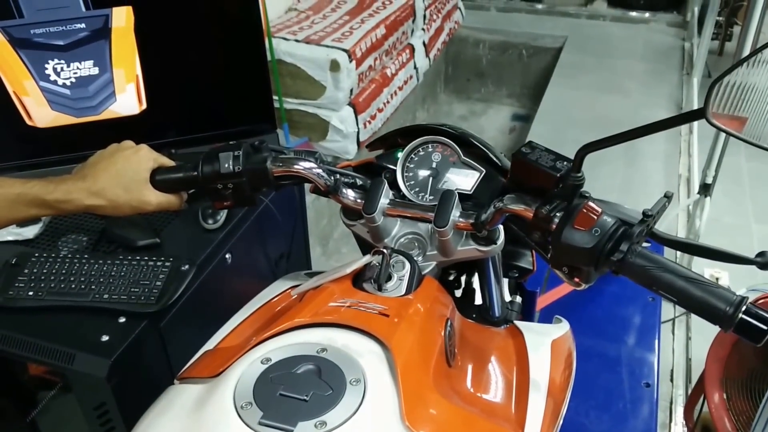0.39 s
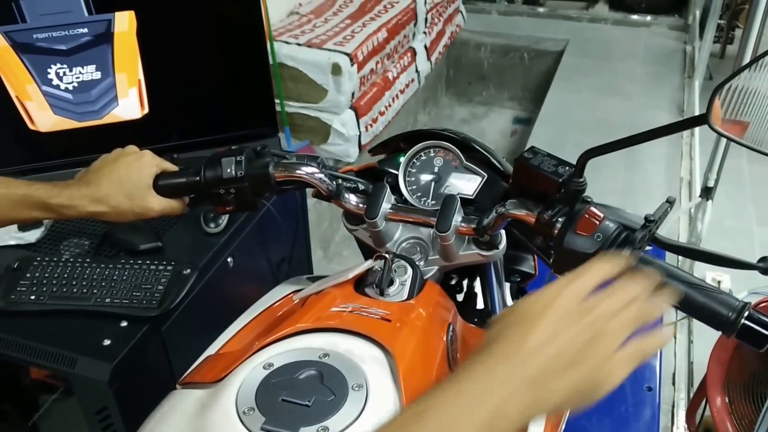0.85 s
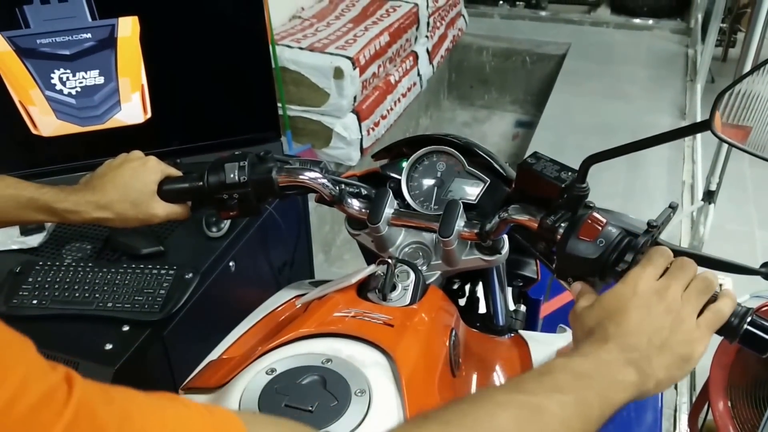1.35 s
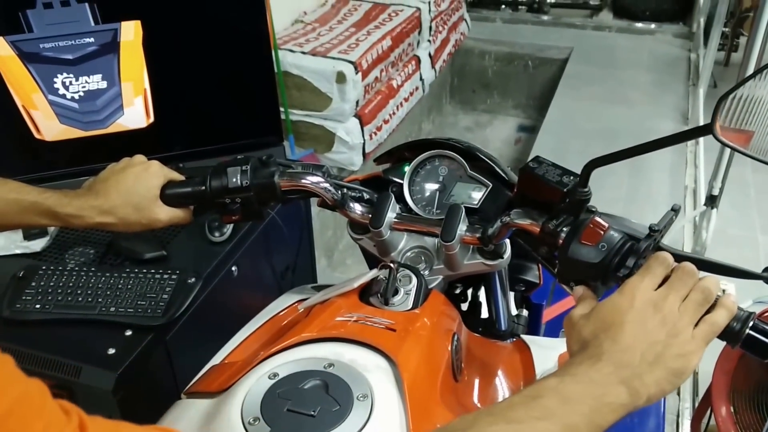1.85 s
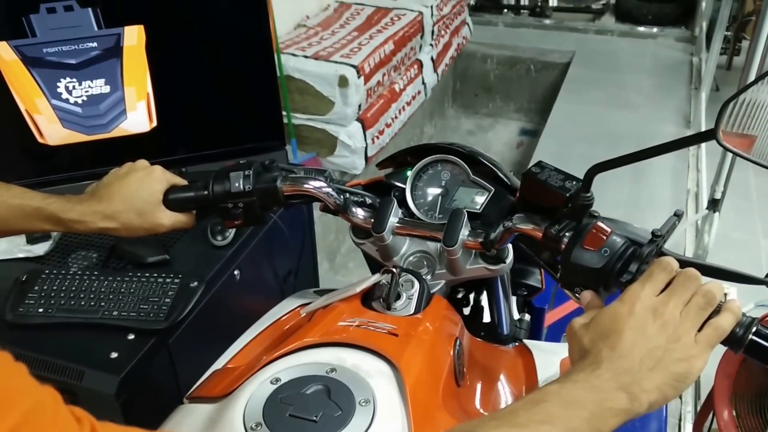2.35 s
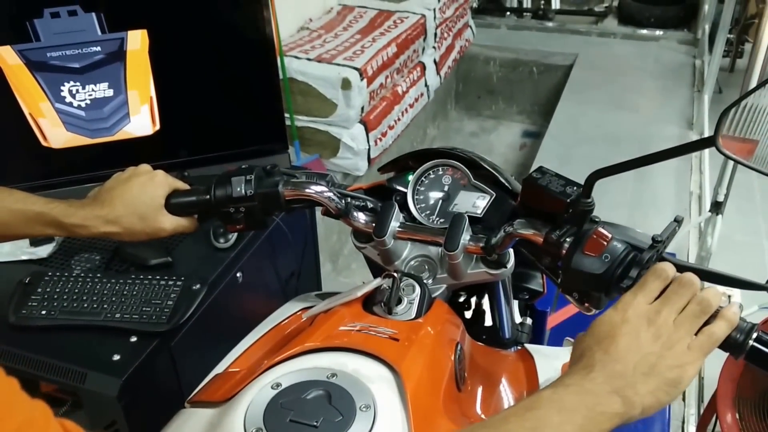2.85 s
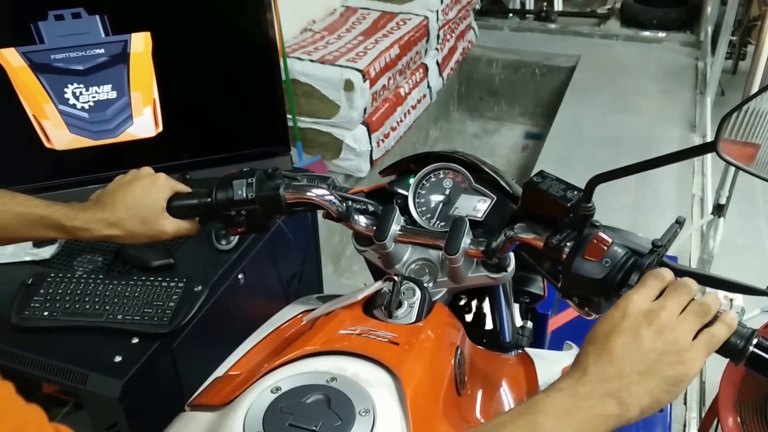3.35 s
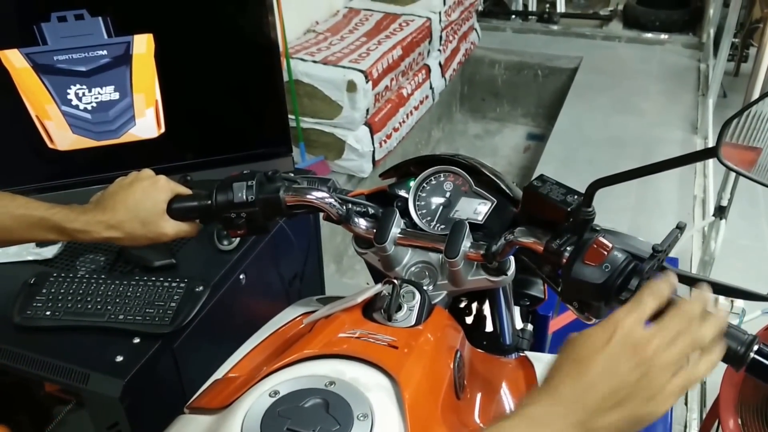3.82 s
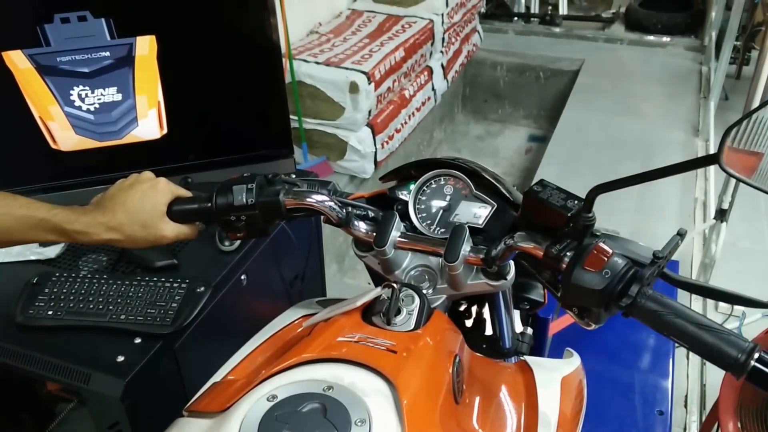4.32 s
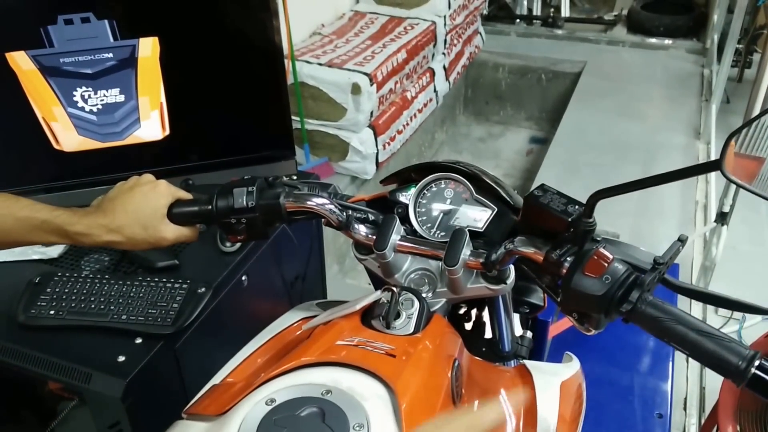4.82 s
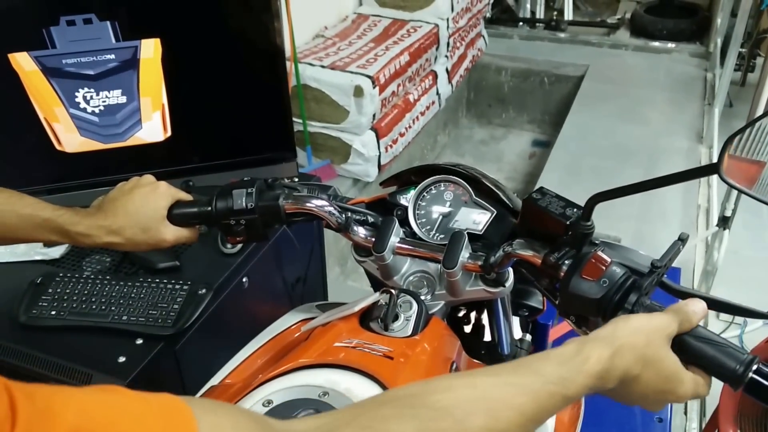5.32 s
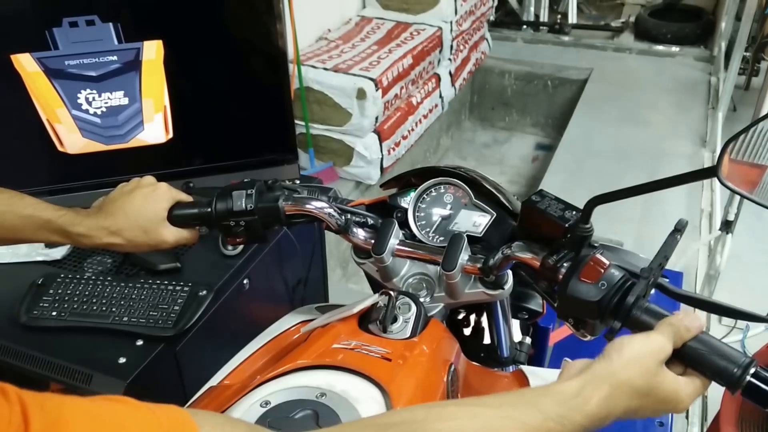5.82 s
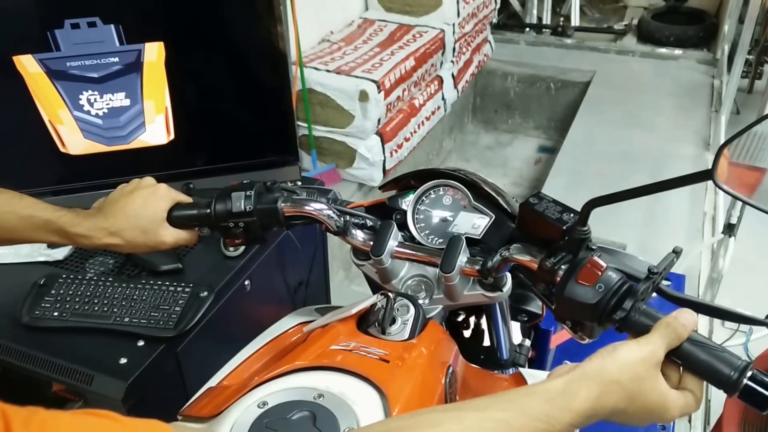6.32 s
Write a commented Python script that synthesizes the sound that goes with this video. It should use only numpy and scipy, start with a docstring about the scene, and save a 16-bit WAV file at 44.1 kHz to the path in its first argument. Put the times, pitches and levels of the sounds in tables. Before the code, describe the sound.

In a quiet echoing workshop, a relay clicks, a starter grinds briefly, and a small single-cylinder motorcycle catches, idles, then revs once and falls back.

```python
"""A far tick or two breaks the rumble and hiss of a quiet hard-walled hall; hums and ticks add sines and echoing pushes.
A relay clicks and the starter grinds: gear teeth as shaped noise, motor whine as harmonics, knocks as rings.
A small single-cylinder motorcycle engine catches and idles with a few weak firings: each pushes on the silencer
resonances and echoes from floor and wall, while noise and struck modes give the rattle, intake and valves.
Last the engine is revved, an open bark takes over from the silencer, and it coasts back down."""
import sys
import numpy as np
from scipy import signal
from scipy.fft import rfft, irfft, next_fast_len
from scipy.io import wavfile
from scipy.ndimage import uniform_filter1d

SR = 44100
rng = np.random.default_rng(int(sys.argv[2]) if len(sys.argv) > 2 else 0)


def boost(x):
    """Linear amplitude factor 10**(x/20) for a level x in decibels (scalar or array-like)."""
    u = np.asarray(x, float) / 20
    return 10 ** u


def generate_wav(sig):
    """Save sig (samples, or channels by samples) to the path in sys.argv[1] as 16-bit PCM at SR."""
    pcm = np.round(np.clip(np.atleast_2d(sig).T, -1, 1) * 32767).astype(np.int16)
    wavfile.write(sys.argv[1], SR, pcm)


N = 294588
T = np.arange(N) / SR  # time [s]
SIZE = next_fast_len(N + SR)
HZ = np.maximum(np.arange(SIZE // 2 + 1) * SR / SIZE, 1)  # frequency axis of the filters [Hz]

FIRST_FIRING_S = 2.4856
IDLE_HZ = 13.7  # firings per second
# modes of the starter gear and its housing: (frequency [Hz], relative level [dB], t60 [s])
GEAR_MODES = [(1180, -7, 0.11), (1455, -15, 0.092), (2260, -15, 0.057), (2470, -9.5, 0.066),
              (3950, -11, 0.035), (4850, -9, 0.041), (5950, -4, 0.044), (6540, -15, 0.03)]


def filt(x, response):
    """Linear filtering: convolution is multiplication by a response given on HZ."""
    return irfft(rfft(x, SIZE) * response, SIZE)[..., :N]


def shape(points):
    """Spectral envelope: gain over HZ from (frequency [Hz], level [dB]), straight in log frequency."""
    hz, db = np.transpose(points)
    return boost(np.interp(np.log(HZ), np.log(np.maximum(hz, 1)), db))


def unit(x):
    """Normalisation of power: scale to rms 1."""
    return x / np.sqrt(np.mean(x ** 2))


def curve(table):
    """Linear interpolation: columns of a table as curves over time."""
    s, *columns = np.transpose(table)
    return [np.interp(T, s, c) for c in columns]


def walk(rate):
    """Low-passed noise: slow random fluctuation of rms 1."""
    width = int(SR / rate)
    smooth = uniform_filter1d(rng.standard_normal(N), width)
    return unit(uniform_filter1d(smooth, width))


def wide(mid, side):
    """Spatial coherence: two microphone ports differ by a filtered side signal and opposite spectral tilts."""
    # side signal and port balance: (frequency [Hz], level [dB])
    side_gain = [(60, -36.5), (110, -9), (200, -29), (380, -10.5), (700, -8.5), (1290, -2.5), (2380, -1.5),
                 (4400, -0.5), (8120, 0.5), (15000, 0)]
    port_balance = [(60, -3), (110, 3.5), (200, -2), (380, 0.5), (700, -3), (1290, -3), (2380, -0.5),
                    (4400, 1), (8120, 3), (15000, 9)]
    side = filt(side, shape(side_gain))
    tilt = np.sqrt(shape(port_balance))
    return filt(np.array([mid + side, mid - side]), np.array([tilt, 1 / tilt]))


def hiss(spectrum, gain):
    """Turbulence and friction as noise: a spectral envelope times a time envelope, in stereo."""
    mid, side = filt(rng.standard_normal((2, N)), shape(spectrum))
    scale = gain / np.sqrt(np.mean(mid ** 2))
    return wide(mid * scale, side * scale)


def ring(x, modes):
    """Modal synthesis: a struck solid rings as a sum of decaying sines."""
    t = T[:SR // 4]
    body = sum(boost(db) * np.sin(2 * np.pi * hz * t) * 1000. ** (-t / t60) for hz, db, t60 in modes)
    return filt(x, rfft(body, SIZE))


def resonate(modes, order=1):
    """Air resonance: a sum of band-pass responses; coupled chambers (order 2) fall off steeply."""
    return sum(sign * boost(db) * (1j * HZ * w / (hz ** 2 - HZ ** 2 + 1j * HZ * w)) ** order
               for hz, w, db, sign in modes)


def room(x):
    """Reverberation: a diffuse tail is exponentially decaying noise, here of unit energy."""
    t60 = 0.84  # s
    t = T[:SR]
    tail = rng.standard_normal((2, SR)) * 1000. ** (-t / t60) * np.clip(t / 0.0018, 0, 1)
    tail = tail / np.sqrt(np.sum(tail ** 2, axis=1, keepdims=True))
    return wide(*filt(x, rfft(tail, SIZE)))


def spikes(times, gains):
    """Impulsive excitation: one-sample pushes at given times."""
    return np.bincount(np.clip((np.asarray(times) * SR).astype(int), 0, N - 1), gains, N)


def bump(s, spread):
    """Gaussian envelope: a smooth swell of height 1 around a moment."""
    return np.exp(-.5 * ((T - s) / spread) ** 2)


def engine():
    """Four-stroke cycle: firings fall where the integrated speed completes a cycle of two crank turns."""
    # exhaust blows grow with time since the first firing, charge and speed
    blow_start_db, warm_db_per_s, charge_blow_db = -4, 0.67, 4
    rev_blow_db, full_blow_hz = 6.5, 8.7  # the rise is complete this far above idle
    # clatter grows with speed and load, and is loud as the engine catches
    clatter_db, octave_db, load_db, catch_db, settle_s = -32, 8, 5.5, 25, 0.081
    idle_throb, load_throb, rev_throb = 0.36, 0.31, 0.089  # shares 0-1 that throb with the cycle
    # the rattle surges and dips during the rev: (peak time [s], change [dB], fade [s])
    surges = [(5.87, 1.5, 0.032), (6.047, 0, 0.014), (6.121, -7, 0.019), (6.188, 1.5, 0.87)]
    surge_rise_s = 0.043

    charge, hz = crank()
    running = T >= FIRST_FIRING_S
    since = np.maximum(T - FIRST_FIRING_S, 0)
    cycles = np.cumsum(hz * running) / SR
    fired = np.interp(np.arange(int(cycles[-1]) + 1), cycles[running], T[running])
    revs = np.clip((hz - 14) / 35, 0, 1)

    blow_db = blow_start_db + warm_db_per_s * since + charge_blow_db * charge
    blow_db = blow_db + rev_blow_db * np.clip((hz - IDLE_HZ) / full_blow_hz, 0, 1)

    level_db = clatter_db + octave_db * np.log2(hz / IDLE_HZ) + load_db * charge
    level_db = level_db + catch_db * np.exp(-since / settle_s)
    for s, db, fade in surges:
        rise = np.clip(1 + (T - s) / surge_rise_s, 0, 1)
        level_db = level_db + db * rise * np.exp(-np.maximum(T - s, 0) / fade)
    throb = idle_throb * (1 - revs) + rev_throb * revs + load_throb * charge
    return exhaust(fired, revs, blow_db, charge) + clatter(cycles, fired, revs, level_db, throb)


def crank():
    """Rotational inertia: cylinder charge 0-1 spins the crank up and friction lets it coast back."""
    # the starter drags it round, then it pulls up to idle (speeds in firings per second)
    cranked_hz, at_idle_s, pull_up_s = 9.82, 2.712, .1107
    # the idle sags and recovers: (time [s], sag [Hz], Gaussian spread [s])
    sags = [(3.39, .2967, .2894), (4.176, .4918, .2279), (5.368, .7917, .08868)]
    # the throttle rolls open and snaps shut
    open_s, roll_s, shut_s, empty_s, pull_hz_per_s, coast_s = 5.612, .4859, 6.082, .108, 128.8, 1.24

    filling = np.clip((T - open_s) / roll_s, 0, 1) ** .5
    charge = filling * np.exp(-(np.maximum(T - shut_s, 0) / empty_s) ** 2)
    hz = IDLE_HZ - (IDLE_HZ - cranked_hz) * np.clip((at_idle_s - T) / pull_up_s, 0, 1)
    hz = hz - sum(sag * bump(s, spread) for s, sag, spread in sags)
    spun_up = signal.lfilter([1], [1, -np.exp(-1 / (coast_s * SR))], charge)
    return charge, hz + pull_hz_per_s / SR * spun_up


def exhaust(fired, revs, blow_db, charge):
    """Source and resonator: gas pushes ring the silencer, floor and wall echo; at speed open bark takes over."""
    # runs of firings on a lean (or rich) charge: (start [s], length [s], blow change [dB])
    weak_runs = [(2.486, 0, -7), (2.678, 0, -1), (2.9, 0, -4.5), (3.122, 0, -3), (4.243, 0, -6.5),
                 (5.35, .24, -4.5), (5.935, 0.1, 3.5), (6.08, .04, -0.5), (6.165, .07, -4.5),
                 (6.627, .07, -15)]
    # the engine breathing out while the starter turns it: (time [s], blow [dB])
    crank_puffs = [(2.197, -30), (2.242, -21), (2.329, -19.5), (2.401, -23)]
    # silencer resonances: (frequency [Hz], width [Hz], level [dB], polarity and weight)
    silencer = [(69, 3.2, 26, -0.028), (94.36, 20.4, 40, -1.64), (108.3, 14.6, 47, 0.83),
                (133.2, 10, 27.5, 0.73), (184, 5.6, 26, 0.69), (199.3, 7.6, 29, 0.92), (253, 8.7, 13, 1),
                (283.8, 6, 28, 0.79), (321, 5.3, 7, -0.74), (358, 5.7, 23.5, -0.54), (382.6, 5.1, 24, 0.6),
                (431.8, 4.3, 21.5, 0.22)]
    # airbox and pipe with fast gas in them: (frequency [Hz], width [Hz], level [dB], polarity and weight)
    open_pipe = [(76, 9.8, 24, 1), (101.8, 39, 37.5, 0.61), (135.7, 14, 40, -0.58), (195, 36, 32, -0.49),
                 (224.4, 24, 15.5, 1), (285.5, 22, 25.5, -0.45), (332, 18, 22.5, 0.42),
                 (383, 11.4, 23, -0.31), (443, 14, 16, 0.65), (482, 14, 1, -0.85), (548.3, 19, 12.5, 0.7)]
    # floor and wall echoes: (delay [s], level [dB], polarity and weight)
    reflections = [(0.011, -9, -1.71), (.03, -0.5, 0.78)]
    vent_s, long_share = 0.003, 0.78  # a full charge vents in two pushes this far apart

    fast = np.clip(2.2 * np.interp(fired, T, revs), 0, 1)
    size_chance, moment_chance = rng.standard_normal((2, len(fired)))
    # burning varies less in size at speed here, but more in moment
    db = np.interp(fired, T, blow_db) + (1 - .4 * fast) * size_chance
    heard = fired + .0001 * fast * moment_chance
    for s, length, weak_db in weak_runs:
        db[(fired > s - .02) & (fired < s + length + .02)] += weak_db

    puff_s, puff_db = np.transpose(crank_puffs)
    slow = spikes(np.r_[heard, puff_s], np.r_[boost(db) * (1 - fast), boost(puff_db)])
    echoes = 1 + sum(sign * boost(echo_db) * np.exp(-2j * np.pi * HZ * s) for s, echo_db, sign in reflections)
    near = filt(slow, resonate(silencer) * echoes)

    double = np.clip(long_share * np.interp(fired, T, charge) ** .5, 0, 1)
    vent = (1 + np.exp(-2j * np.pi * HZ * vent_s)) * boost(-2.0)
    push = spikes(heard, boost(db) * fast * (1 - double))
    push = push + filt(spikes(heard, boost(db) * fast * double), vent)
    bark = filt(push, resonate(open_pipe, order=2))
    return wide(near + bark, -near - bark) + room(boost(-20) * near + boost(-20) * bark)


def clatter(cycles, fired, revs, level_db, throb):
    """Amplitude modulation: gear noise swells after each firing; its spectrum moves with the revs."""
    # noise spectra at idle and at full revs: (frequency [Hz], relative level [dB per Hz])
    idle_spectrum = [(260, 5.5), (330, 4), (440, -3.5), (481, -7.5), (700, 0.5), (825, -4.5), (1110, -4),
                     (1350, -5), (1720, -7), (2350, -3.5), (2820, -5), (3040, -7), (5690, -4),
                     (8660, -16.5), (15800, -23)]
    rev_spectrum = [(290, -1.5), (500, -11.5), (687, -5.5), (829, -8), (1540, -11), (1940, -5),
                    (2410, -9.5), (2750, -5), (3510, -3), (4120, -5.5), (5740, -1.5), (7440, -14.5),
                    (12500, -24.5), (15800, -20.5)]
    gain = boost(level_db) * np.clip((T - FIRST_FIRING_S) / 0.14, 0, 1) ** 2
    phase = (cycles - .03) % 1
    cycle_db = rng.standard_normal(400)[np.clip(cycles, 0, 399).astype(int)]
    swell = np.clip(phase / 0.039, 0, 1) * (np.exp(-phase / 0.22) + .5 * np.exp(-phase / .5))
    throb = np.clip(throb, 0, 1)
    beat = 1 - throb + 0.62 * throb * swell * boost(cycle_db)
    rattle = hiss(idle_spectrum, gain * beat * np.sqrt(1 - revs))
    rattle = rattle + hiss(rev_spectrum, gain * beat * np.sqrt(revs))
    rattle = rattle * boost(1.5 * walk(250) - 2.5)
    return rattle + intake(cycles, gain * throb * boost(cycle_db - 8.0)) + valves(fired, revs, gain)


def intake(cycles, gain):
    """Flow noise: the intake hisses in one Gaussian puff per cycle."""
    # (frequency [Hz], relative level [dB per Hz])
    intake_spectrum = [(4000, -30), (7000, 17), (10000, 23), (15800, 11), (17000, -40)]
    puff = np.exp(-.5 * ((cycles % 1 - .08) / 0.075) ** 2)
    return hiss(intake_spectrum, gain * puff)


def valves(fired, revs, gain):
    """Impact excitation of modes: seating valves tick on the engine cases, each blow exciting them differently."""
    # engine case modes: (frequency [Hz], relative level [dB], t60 [s])
    case_modes = [(706, -23, 0.12), (1347, -13.5, 0.052), (2314, -14.5, 0.059), (2816, -15.5, 0.067),
                  (3495, -20.5, 0.098), (4750, -31, 0.0086), (5700, -13, 0.019)]
    period = np.gradient(fired)
    # one valve seats just after the firing, the other late in the cycle
    times = np.r_[fired + .1 * period, fired + .83 * period]
    second = np.arange(len(times)) >= len(fired)
    ticks = 0
    for mode in case_modes:
        size_chance, moment_chance = rng.standard_normal((2, len(times)))
        db = 4.2 * size_chance - 7.5 * second
        ticks = ticks + ring(spikes(times + .003 * moment_chance, boost(db)), [mode])
    ticks = ticks * gain * boost(6.5 - 17 * revs)
    return wide(ticks, ticks * .6) + boost(-10) * room(ticks)


def starter():
    """Superposition: grinding and clashing teeth, motor whine, and knocks of relay and pinion add."""
    gain = starter_gain()
    return grind(gain) + teeth(gain) + whine() + knocks()


def starter_gain():
    """Load modulation: the grind winds up, labours periodically, then freewheels to a stop."""
    relay_s, bite_s, wound_s, first_db, grind_db = 2.016, 0.0063, 2.18, -41, -28
    labour_db, labour_s, turn_s = 3, 2.172, .0712  # swing, moment of a peak, period
    free_s, start_db, free_db_per_s, stop_s, die_s = 2.48, -1, -30, 3.09, 0.22
    wound = np.clip((T - relay_s) / (wound_s - relay_s), 0, 1)
    swing_db = labour_db * wound ** 2 * np.cos(2 * np.pi * (T - labour_s) / turn_s)
    free_db = start_db + free_db_per_s * (T - free_s)
    db = grind_db + (first_db - grind_db) * (1 - wound) ** 2 + np.where(T < free_s, swing_db, free_db)
    return boost(db) * np.clip((T - relay_s) / bite_s, 0, 1) * np.clip((stop_s - T) / die_s, 0, 1)


def grind(gain):
    """Friction noise: gear teeth grind in a hiss roughened by random modulation."""
    # (frequency [Hz], relative level [dB per Hz])
    grind_spectrum = [(190, -9.5), (330, -5.5), (600, -14.5), (1010, -7), (1610, -5), (2450, 2),
                      (2780, -9.5), (3150, -4.5), (3860, -2), (5880, 3), (7610, -4), (8390, -18),
                      (12800, -19), (15800, -17)]
    return hiss(grind_spectrum, gain * boost(.6 * walk(60) + 1.3 * walk(300) - 1.2))


def teeth(gain):
    """Poisson-like impacts: loose teeth clash at random, about 140 a second, and ring the housing."""
    clashes = (rng.random(N) < 140 / SR) * rng.standard_normal(N) * (T > 2.06)
    clashes = gain * boost(-14) * unit(ring(clashes, GEAR_MODES[2:]))
    return wide(clashes, .7 * np.roll(clashes, 40))


def whine():
    """Harmonic series: the motor's pitch and its odd multiples, with wandering pitch and levels."""
    # starter motor: (time [s], pitch [Hz], relative level [dB])
    motor_run = [(2.15, 283, -43), (2.25, 287.5, -43.5), (2.44, 287, -33), (2.5, 296.3, -42.5),
                 (2.57, 311, -34), (2.63, 311, -38), (2.75, 335, -53)]
    # (multiple of the pitch, relative level [dB])
    harmonics = [(1, -4.5), (3, -10), (5, -13)]
    hz, whine_db = curve(motor_run)
    phase = 2 * np.pi * np.cumsum(hz * (1 + 0.011 * walk(35))) / SR
    thin_db = .45 * np.minimum(hz - 308, 0)  # overtones come out as the motor runs free
    tone = sum(boost(db + (k > 1) * thin_db + 2.5 * walk(25)) * np.sin(k * phase) for k, db in harmonics)
    tone = tone * boost(whine_db) * (T > motor_run[0][0]) * (T < motor_run[-1][0])
    return wide(tone, 0 * tone)


def knocks():
    """Contact time: relay and starter gear knock as noise bursts that ring; a short touch rings briefly."""
    # (time [s], relative level [dB], own ring [Hz], contact time [s], relative housing ring level [dB])
    knock_list = [(2.0038, -38, 6400, 0.0005, -90), (2.0141, -9, 6250, 0.00069, -58),
                  (2.055, -19, 2340, 0.0034, -45), (2.071, -16.5, 1485, 0.0026, -63),
                  (2.113, -13.5, 3950, 0.003, -61), (2.241, -8, 4850, 0.008, -58),
                  (2.45, -7.5, 4710, 0.0089, -58), (2.585, -11, 6080, 0.0099, -55),
                  (2.682, -15.5, 6130, 0.0041, -57), (2.756, -13, 1317, 0.0064, -70)]
    rings_per_contact, longest_t60 = 18, .075  # ratio, s
    total = 0
    for s, db, hz, contact, housing_db in knock_list:
        t60 = min(rings_per_contact * contact, longest_t60)
        t = np.maximum(T - s, 0)
        crack = rng.standard_normal(N) * t / contact * np.exp(1 - t / contact)
        own = np.sin(2 * np.pi * hz * t) * 1000. ** (-t / t60) * np.clip(t / contact, 0, 1)
        total = total + boost(db - 17.5) * crack + boost(db - 10.0) * own
        total = total + boost(housing_db) * ring(crack, GEAR_MODES)
    total = filt(total, 1 / (1 + (HZ / 9000) ** 4) / (1 + (900 / HZ) ** 2))
    return wide(total, .4 * total) + boost(-6) * room(total)


def hall():
    """Background noise: rumble and hiss of the building under hums and ticks."""
    # (frequency [Hz], relative level [dB per Hz])
    hall_spectrum = [(18, -57), (30, -39), (53, -1.5), (117, -11), (148, -2), (257, -13), (286, -9),
                     (470, -21.5), (837, -27.5), (1270, -33.5), (1900, -36), (2720, -30), (3700, -35),
                     (5240, -27.5), (10400, -40.5), (15800, -34.5)]
    return hiss(hall_spectrum, boost(-64.5 + .8 * walk(6))) + hums() + ticks()


def hums():
    """Pure tones: two faint machine hums, each a sine of wavering level."""
    # (frequency [Hz], relative level [dB])
    hum_tones = [(145.3, -72.5), (812.9, -86)]
    return sum(boost(db + 1.5 + 2.1 * walk(9.3)) * np.sin(2 * np.pi * hz * T) for hz, db in hum_tones)


def ticks():
    """Direct-to-reverberant ratio: far ticks are mostly echo; each is a short scatter of touches."""
    # (time [s], relative level [dB], echo over tick [dB], own ring [Hz])
    tick_list = [(.399, -54, 5, 4500), (0.606, -45, 19, 4500), (.618, -47, 2, 3500), (0.866, -49, -7, 2700),
                 (1.541, -51, 2, 2600), (1.821, -53, 3, 3000), (1.953, -56, -1, 5050)]
    # spectra of direct sound and echo: (frequency [Hz], relative level [dB per Hz])
    direct_spectrum = [(600, -22), (1500, -7), (2700, -13.5), (5000, -5), (9000, -10), (16000, -26)]
    echo_spectrum = [(880, -64), (1500, -34), (2600, -24), (3770, -6), (4300, -17), (4800, -5), (5630, 1),
                     (6800, 0), (8600, -19), (12000, -43), (15600, -66)]
    s, db, echo_db, own_hz = np.transpose(tick_list)
    colour = shape(direct_spectrum) / np.mean(shape(direct_spectrum))
    direct = 0
    for start, tick_db, hz in zip(s, db, own_hz):
        touches = spikes(start + 0.004 * rng.random(6), np.full(6, boost(tick_db - 10.5)))
        direct = direct + filt(touches, colour * (1 + resonate([(hz, 900, 8, 1)])))
    echo = filt(spikes(s, boost(db + echo_db)), shape(echo_spectrum) / np.mean(shape(echo_spectrum)))
    return boost(3) * direct + room(echo)


def scene():
    """Superposition: engine, starter and hall add at the microphone."""
    return engine() + starter() + hall()


def top_cut(x):
    """Nothing passes above the cut-off."""
    return signal.sosfilt(signal.butter(12, 15910, fs=SR, output="sos"), x)


def record(dry):
    """Microphone response: a high-pass drops the deep bass and saturation rounds the loudest peaks."""
    s = 1j * HZ / 45
    heard = filt(dry, (s * s / (s * s + 1.434 * s + 1)) ** 2)
    mix = 1.307 * np.tanh(1.214 * heard)
    return top_cut(mix)


dry = scene()
out = record(dry)
generate_wav(out)
```